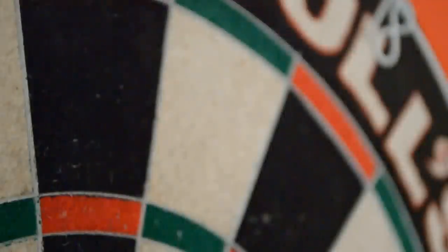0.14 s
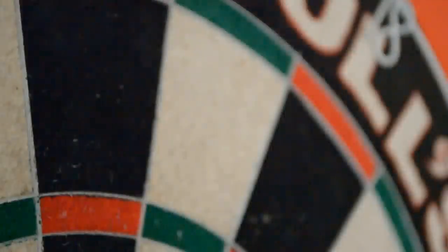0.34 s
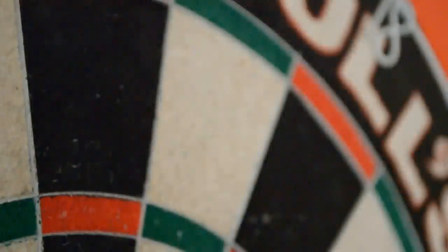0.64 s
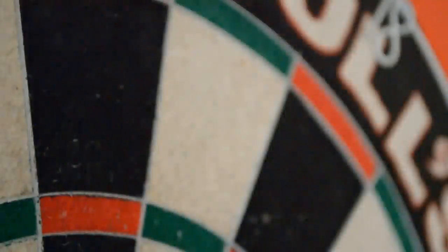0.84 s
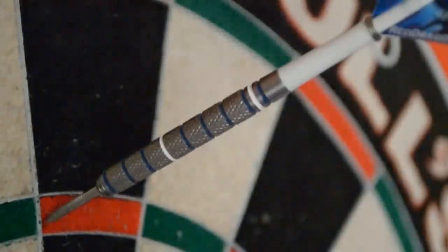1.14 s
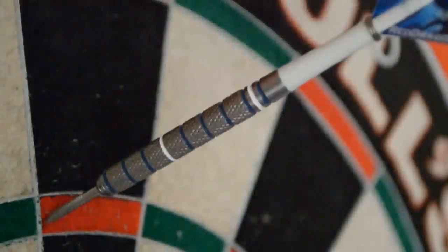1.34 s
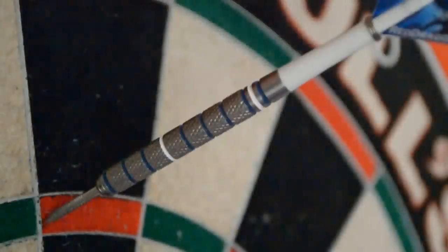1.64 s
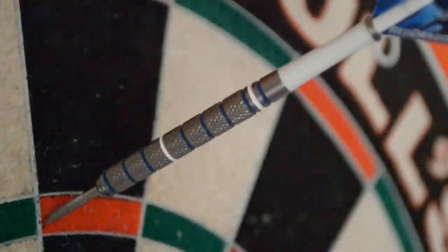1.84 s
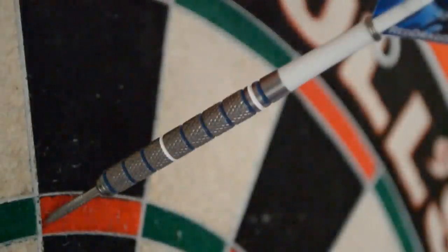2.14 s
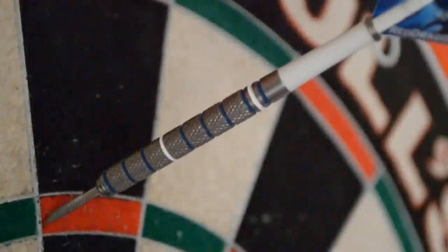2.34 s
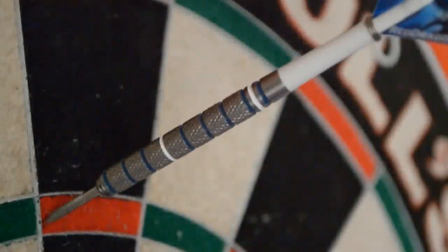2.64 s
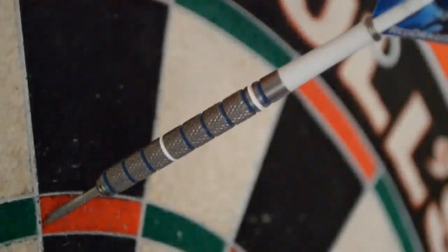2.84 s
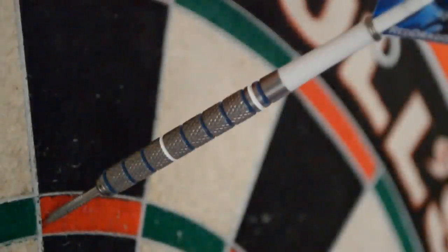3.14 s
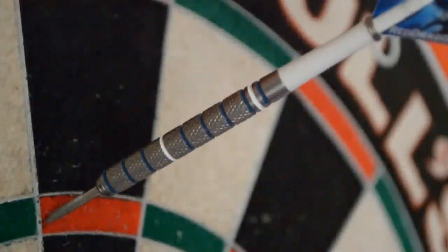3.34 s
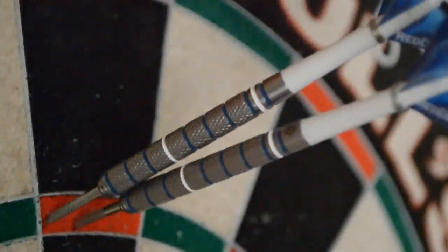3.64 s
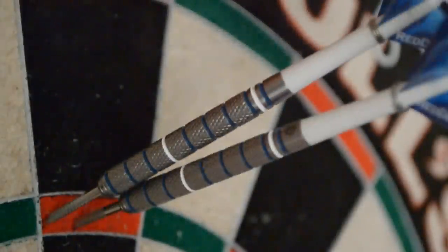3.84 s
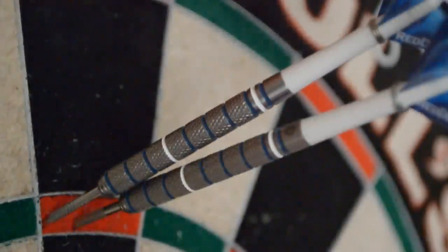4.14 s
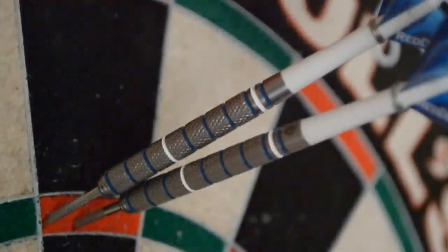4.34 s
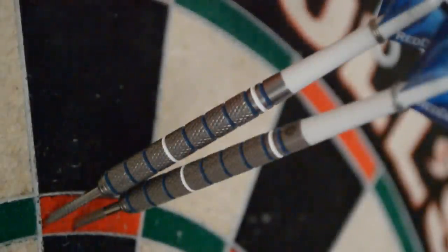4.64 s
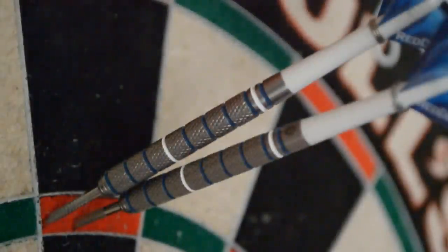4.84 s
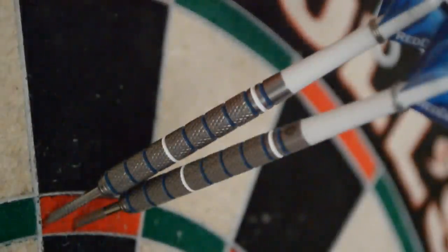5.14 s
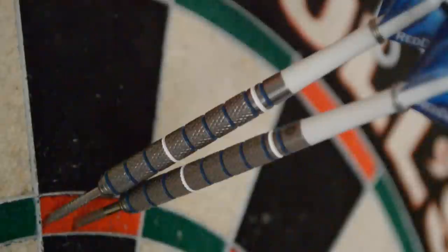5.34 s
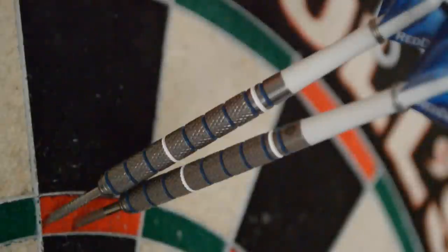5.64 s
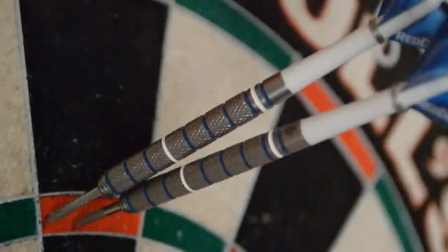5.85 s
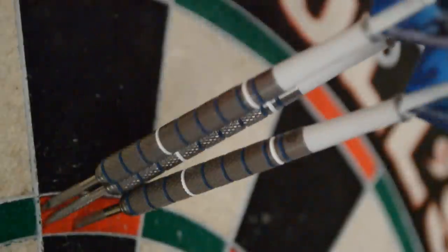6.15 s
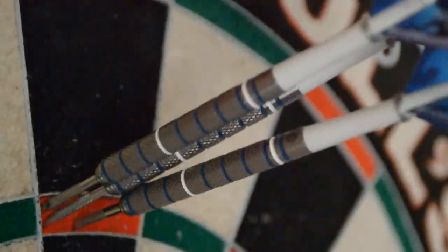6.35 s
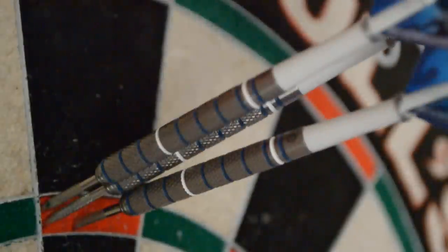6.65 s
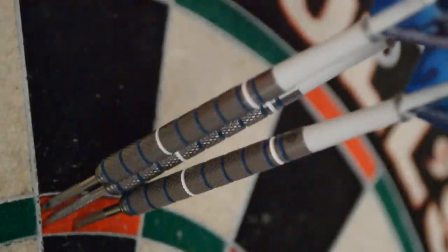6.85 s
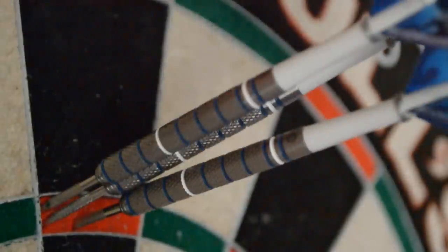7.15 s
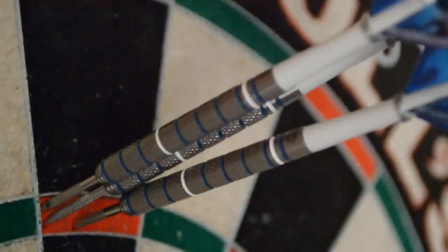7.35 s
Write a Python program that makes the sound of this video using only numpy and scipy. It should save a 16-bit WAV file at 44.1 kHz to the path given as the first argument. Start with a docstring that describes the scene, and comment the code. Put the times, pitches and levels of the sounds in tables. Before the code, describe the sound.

Close dry dart impacts in a small quiet room: one clean woody thump, then two sharper hits with metallic clicks and a brief rattle.

```python
"""Three steel-tip darts thud into one bed of a bristle dartboard, close to the microphone in a small quiet room.
Each stop is a thump, a rough knock and ringing board modes; the parted fibres add a hiss and a soft push.
The first lands cleanly; the next two clash with the darts already there (clicks and rings through short
rough contacts) and leave them rattling. The room answers with dense echoes and standing waves over hiss,
hum and rumble; the loudest peaks clip."""
import sys
import numpy as np
from scipy import signal
from scipy.fft import rfft, irfft
from scipy.io import wavfile

SR = 44100
rng = np.random.default_rng(int(sys.argv[2]) if len(sys.argv) > 2 else 0)


def transcribe(u):
    """Save the signal u as a 16-bit wav file named by the first command-line argument.

    u: samples, shape (n,) or (channels, n), limited to [-1, 1]; the rate is SR.
    q: integer samples, one column per channel.
    """
    v = np.clip(np.atleast_2d(u).T, -1, 1)
    q = np.round(v * 32767).astype(np.int16)
    wavfile.write(sys.argv[1], SR, q)


N = 330377

# darts stopping in the board: (time [s], board ring [dB], thump [dB], rough knock [dB],
# upper modes' tilt [dB/octave])
DART_STOPS = [(1.2743, -4, 9.5, 15.5, 1), (3.8380, -6.5, 12, 20.5, -3.5), (6.394, -5.5, -6.5, 17.5, -7)]
# spectrum of the board's dull thump: (frequency [Hz], level [dB])
THUMP_SPECTRUM = [(30, -14), (100, -5.5), (260, 6), (400, -2.5), (700, -10), (1200, -29.5), (3000, -52),
                  (16000, -69.5)]
# room decay: (frequency [Hz], t60 [s])
ROOM_DECAY = [(47, 1.1), (90, 0.57), (220, 0.3935), (750, 0.39), (2000, 0.313), (4500, 0.2856),
              (9000, 0.27), (15000, 0.12)]


def amp(db):
    """Decibels to gain."""
    return 10 ** (np.asarray(db) / 20)


def read(points, hz):
    """A table's value, interpolated on a log-frequency axis."""
    f, value = np.transpose(points)
    return np.interp(np.log(hz + 1), np.log(f + 1), value)


def add(mix, start_s, sound):
    """Adds a sound to the mix at start_s, cut at the end of the mix."""
    part = mix[round(start_s * SR):][:len(sound)]
    part += sound[:len(part)]


def noise(spectrum):
    """Steady coloured noise of rms 1."""
    gain = amp(read(spectrum, np.fft.rfftfreq(N, 1 / SR)))
    x = irfft(rfft(rng.standard_normal(N)) * gain, N)
    return x / x.std()


def click(spectrum, size=4096):
    """A causal (minimum-phase) impulse with the given spectrum, padded to one second."""
    log_gain = np.log(amp(read(spectrum, abs(np.fft.fftfreq(size, 1 / SR)))))
    minimum_phase = np.exp(np.conj(signal.hilbert(log_gain)))
    impulse = np.fft.ifft(minimum_phase).real[:size // 2]
    return np.pad(impulse, (0, SR - size // 2))


def ring(modes, tilt_db=0, above_hz=1000, uneven_db=0, detune=0):
    """One second of decaying modes; tilt in dB/octave above above_hz, random level and pitch shifts per blow."""
    t = np.arange(SR) / SR
    hz, db, t60_s = np.transpose(modes)
    spot, grip = 2 * rng.random((2, len(hz))) - 1
    db = db + tilt_db * np.log2(np.maximum(hz, above_hz) / above_hz) + uneven_db * spot
    hz = hz * (1 + detune * grip)
    decays = np.exp(-np.log(1000) * t / t60_s[:, None])
    sines = np.sin(2 * np.pi * hz[:, None] * t)
    return amp(db) @ (decays * sines)


def contact(decay_s, size=1024, count=5):
    """Force of a rough, sliding contact: a dying noise burst of near-even spectrum and energy 1."""
    fade = np.exp(-np.arange(size) / SR / decay_s)
    force = rng.standard_normal(size) * fade
    for _ in range(count):  # flatten the spectrum, then restore a fade
        flat = irfft(np.exp(1j * np.angle(rfft(force))))
        force = flat * fade ** (1 / 4)
    return force / np.linalg.norm(force)


def swell(rise_s):
    """One second of a gain that builds up from zero."""
    return 1 - np.exp(-np.arange(SR) / SR / rise_s)


def radiate(x, corner_hz=105):
    """A small board radiates little deep bass: second-order highpass."""
    return signal.sosfilt(signal.butter(2, corner_hz, "highpass", fs=SR, output="sos"), x)


def board():
    """Each stop thumps and roughly knocks the board and sets it ringing on its wall mount."""
    # modes of the mounted board: (frequency [Hz], level [dB], t60 [s])
    board_modes = [(220, -18.5, 0.028), (264, -12, .026), (393.5, -4.5, .068), (521, -19, .03),
                   (690, -1.5, 0.027), (736, -12, 0.027), (910, -32.5, 0.029), (1480, -32, 0.03),
                   (1870, -35, 0.035)]
    # toneless knock: (frequency [Hz], level [dB])
    knock_spectrum = [(60, -30.5), (250, -10.5), (500, 6), (800, 0.5), (1050, -15.5), (1500, -9.5),
                      (1950, -10.5), (2600, -19), (5000, -30), (16000, -54.5)]
    out = np.zeros(N)
    for s, ring_db, thump_db, knock_db, tilt_db in DART_STOPS:
        ringing = ring(board_modes, tilt_db, above_hz=400) * swell(rise_s=0.0013)
        knock = signal.fftconvolve(click(knock_spectrum), contact(decay_s=0.0046))
        add(out, s, amp(ring_db) * ringing)
        add(out, s, amp(thump_db) * click(THUMP_SPECTRUM))
        add(out, s, amp(knock_db) * knock)
    return radiate(out)


def points():
    """A steel point parting the sisal fibres: a short hiss and a soft push on the board."""
    # (time [s], hiss [dB], contact decay [s], push on the board [dB])
    pierces = [(1.273, -2.5, 0.006, 22.5), (3.8317, 10, 0.0013, 12.5), (6.396, 9.5, .0015, -1.5)]
    # hiss: (frequency [Hz], level [dB])
    scrape_spectrum = [(200, -19.5), (1500, -5.5), (3500, -10), (5500, -1.5), (8000, -4.5), (9200, 4.5),
                       (10600, 0.5), (12000, -12), (16000, -18.5)]
    out = np.zeros(N)
    for s, hiss_db, decay_s, push_db in pierces:
        hiss = signal.fftconvolve(click(scrape_spectrum), contact(decay_s))
        add(out, s, amp(hiss_db) * hiss)
        add(out, s, amp(push_db) * click(THUMP_SPECTRUM))
    return radiate(out)


def darts():
    """Each clash with the stuck darts rings barrels and shafts; then the shafts slide past each other."""
    # (time [s], steel barrel [dB], plastic shaft and flight [dB], shaft's treble tilt [dB/octave])
    clashes = [(3.8244, 2, -8.5, 3), (3.8318, -15.5, 5, -3.5), (3.8363, -4, -4.5, 3), (6.3814, 0.5, -10, 4),
               (6.3843, 7.5, -6.5, 0), (6.3918, -5, -3, 0.5)]
    slide_delay_s, slide_decay_s, slide_db, slide_tilt_db = .0035, 0.0026, -7, 2
    out = np.zeros(N)
    for s, steel_db, plastic_db, tilt_db in clashes:
        add(out, s, touch(steel_db, plastic_db, tilt_db))
        slide = signal.fftconvolve(plastic(slide_tilt_db), contact(slide_decay_s))
        add(out, s + slide_delay_s, amp(slide_db) * slide)
    return out


def rattle(count=7):
    """The shaken darts quiver in bending and tap each other at uneven gaps and levels, fading on average."""
    # (start [s], quiver [dB], first tap [dB], tap fade [dB/s])
    rattles = [(3.842, 4, -27.5, 119.5), (6.4066, 0, -19, 148.5)]
    # bending modes of a dart held by its point: (frequency [Hz], level [dB], t60 [s])
    quiver_modes = [(672, -28.5, .1), (800, -27.5, .1), (905, -28, .11), (1010, -33, .09)]
    tap_gap_s, tap_jitter_s, tap_uneven_db = 0.0051, 0.0017, 5
    plastic_over_steel_db, tap_tilt_db = 5.5, 0.5
    out = np.zeros(N)
    for s, quiver_db, first_db, fade_db_per_s in rattles:
        quiver = ring(quiver_modes, detune=.01) * swell(rise_s=.003)
        add(out, s, amp(quiver_db) * quiver)
        for k, (late, strong) in enumerate(2 * rng.random((count, 2)) - 1):
            db = first_db - fade_db_per_s * k * tap_gap_s + tap_uneven_db * strong
            tap_s = s + k * tap_gap_s + tap_jitter_s * late
            add(out, tap_s, touch(db, db + plastic_over_steel_db, tap_tilt_db))
    return out


def touch(steel_db, plastic_db, tilt_db):
    """One glancing contact of two darts: steel touches briefly, plastic gives way and touches for longer."""
    steel_part = signal.fftconvolve(steel(), contact(decay_s=0.0011))
    plastic_part = signal.fftconvolve(plastic(tilt_db), contact(decay_s=.002))
    return amp(steel_db) * steel_part + amp(plastic_db) * plastic_part


def steel():
    """The click and high ring of a steel point and barrel."""
    # (frequency [Hz], level [dB], t60 [s])
    barrel_modes = [(8450, -16, 0.02), (8770, -14, .017), (9210, -11, 0.013), (9130, -12, 0.022),
                    (9740, -13.5, 0.016), (10170, -14.5, 0.019), (10960, -18, 0.013), (11410, -20, 0.0056)]
    # (frequency [Hz], level [dB])
    steel_spectrum = [(200, -30.5), (2000, -8), (6000, 4.5), (9000, 17), (11300, 13.5), (12500, 1),
                      (13700, -6), (16000, -10.5)]
    return ring(barrel_modes, uneven_db=0.5, detune=0.011) + click(steel_spectrum)


def plastic(tilt_db, above_hz=1900):
    """The click and lower ring of a shaft and flight; a harder contact (higher tilt) is brighter."""
    # (frequency [Hz], level [dB], t60 [s])
    shaft_modes = [(1735, -23.5, .032), (1865, -14.5, 0.02), (2500, -26.5, 0.0069), (3320, -31, 0.013),
                   (4120, -30.5, .014), (4420, -20.5, 0.017), (4630, -21, .013), (4870, -22, 0.015),
                   (6557, -26, .012), (7020, -25.5, 0.018), (7450, -24, 0.016)]
    # (frequency [Hz], level [dB])
    plastic_spectrum = [(60, -32), (300, -13.5), (900, 2), (1300, 2.5), (1900, 13.5), (3100, 7),
                        (4700, 14.5), (7000, 8), (11000, 6), (16000, -18)]
    colour = [(hz, db + tilt_db * np.log2(max(hz / above_hz, 1))) for hz, db in plastic_spectrum]
    return ring(shaft_modes, tilt_db, above_hz, uneven_db=2, detune=.025) + click(colour)


def boom():
    """The room's standing waves build up after each thud and outlast it."""
    # (frequency [Hz], level [dB])
    room_modes = [(47, -42), (60, -53.5), (86, -40.5), (115, -50.5), (213, -35.5), (232, -32.5), (394, -37),
                  (465, -40), (540, -41.5), (668, -35.5), (738, -42), (807, -46), (912, -45)]
    modes = [(hz, db, read(ROOM_DECAY, hz)) for hz, db in room_modes]
    waves = ring(modes) * swell(rise_s=0.0084)
    out = np.zeros(N)
    for s, ring_db, *_ in DART_STOPS:
        add(out, s, amp(ring_db) * waves)
    return out


def room(x, first_echo_s=.0045, build_s=.006):
    """Dense echoes of random sign; each frequency band has its own strength and decay."""
    # echo strength: (frequency [Hz], level [dB])
    room_gain = [(50, -28), (130, -12), (250, -12.5), (400, -19), (550, -9.5), (750, -12), (950, -6.5),
                 (1250, -10), (1800, -7.5), (4500, -13), (9000, -19), (15000, -15.5)]
    taps = rng.choice([-1., 1.], SR) * (rng.random(SR) < 5000 / SR)  # about 5000 echoes per second
    hz, t, bands = signal.stft(taps / taps.std(), SR, nperseg=512)
    t60_s = read(ROOM_DECAY, hz)[:, None]
    decay = np.exp(-np.log(1000) * t / t60_s)
    unit_energy = np.sqrt(2 * np.log(1000) / (t60_s * SR))
    bands = bands * amp(read(room_gain, hz))[:, None] * decay * unit_energy
    tail = signal.istft(bands, SR, nperseg=512)[1][:SR] * swell(build_s)
    return signal.fftconvolve(x, np.pad(tail, (round(first_echo_s * SR), 0)))[:N]


def background():
    """Steady air and microphone hiss, faint hum of wandering phase, and soft swells of low rumble."""
    # hiss colour: (frequency [Hz], relative density [dB])
    hiss_spectrum = [(15, -50), (25, -18.5), (41, -3.5), (59, 1), (73, -2.5), (86, -19.5), (101, -2.5),
                     (119, -3), (133, -3), (148, -16.5), (173, -5), (240, -6.5), (289, -6.5), (1850, -11),
                     (15500, -21)]
    # hum lines: (frequency [Hz], level [dB rms])
    hum_lines = [(56, -79.5), (117, -80.5), (232, -79.5), (262, -81.5)]
    # rumble swells: (middle [s], half width to 1/e [s], peak level [dB rms])
    rumbles = [(2.36, 0.064, -68.5), (5.25, 0.16, -67.5), (5.82, 0.19, -61), (6.14, .1, -66.5),
               (7.08, .25, -63)]
    # rumble colour: (frequency [Hz], relative level [dB])
    rumble_spectrum = [(30, -17), (110, -10), (190, 0.5), (260, 3.5), (380, -10.5), (600, -13),
                       (1500, -20.5), (6000, -52)]
    hiss_db = -62.5  # rms
    t = np.arange(N) / SR
    drift_rad = np.cumsum(rng.standard_normal((len(hum_lines), N)), axis=1) * .02
    hum = np.zeros(N)
    for (hz, db), phase_rad in zip(hum_lines, drift_rad):
        hum += amp(db) * np.sqrt(2) * np.sin(2 * np.pi * hz * t + phase_rad)
    swells = sum(amp(db) * np.exp(-((t - s) / width_s) ** 2) for s, width_s, db in rumbles)
    return amp(hiss_db) * noise(hiss_spectrum) + hum + swells * noise(rumble_spectrum)


def scene():
    """Direct blows and tips, room and background; the points, right by the microphone, carry the least echo."""
    blows = board() + darts() + rattle()
    tips = points()
    echoes = room(blows + amp(-2.0) * tips)
    return (blows + tips + echoes + boom() + background())[None]


def record(dry):
    """The input clips the loudest peaks (at 4x rate, against aliasing); then a lowpass limits the band."""
    clip_level, edge_hz = .52, 15900
    fine = signal.resample_poly(dry, 4, 1, axis=1)
    clipped = signal.resample_poly(np.clip(fine, -clip_level, clip_level), 1, 4, axis=1)
    lowpass = signal.firwin(255, edge_hz, window=("kaiser", 9), fs=SR)
    return signal.oaconvolve(clipped, lowpass[None], "same")


dry = scene()
out = record(dry)
transcribe(out)
```